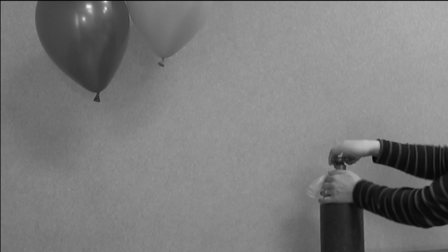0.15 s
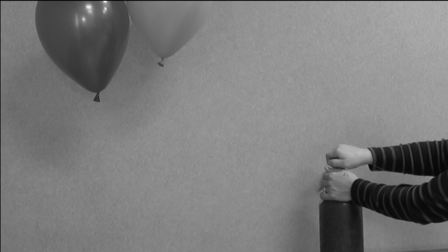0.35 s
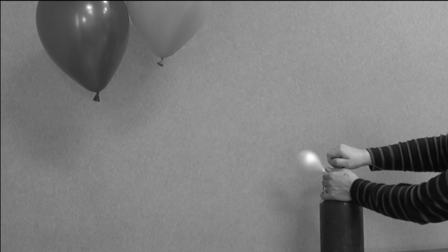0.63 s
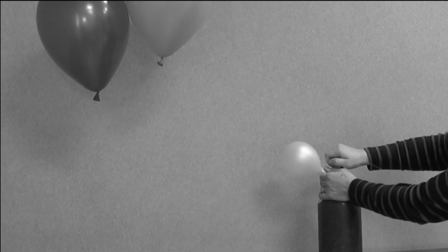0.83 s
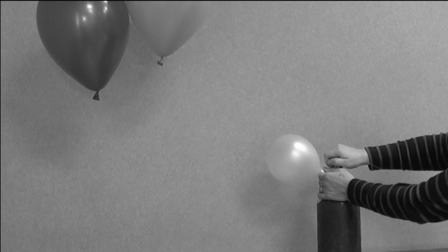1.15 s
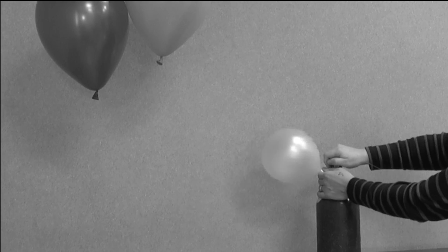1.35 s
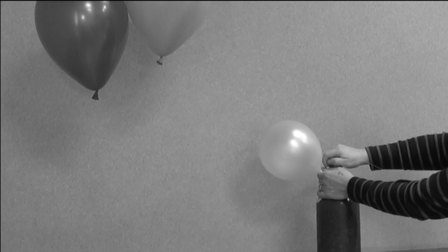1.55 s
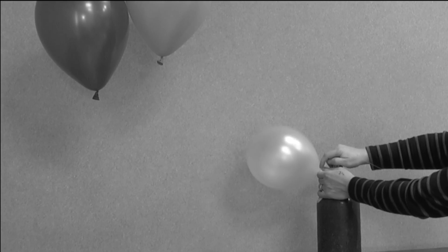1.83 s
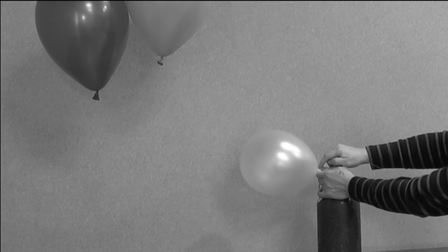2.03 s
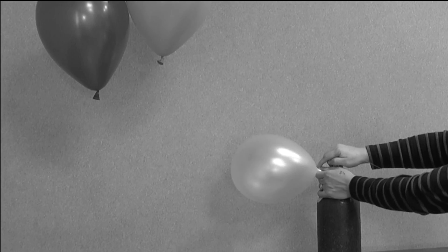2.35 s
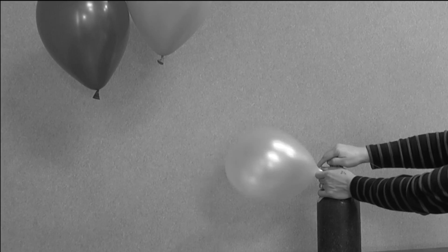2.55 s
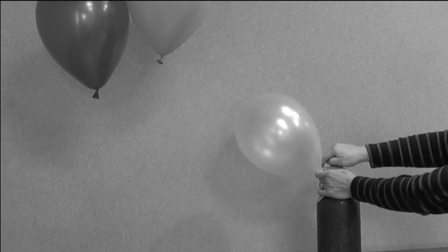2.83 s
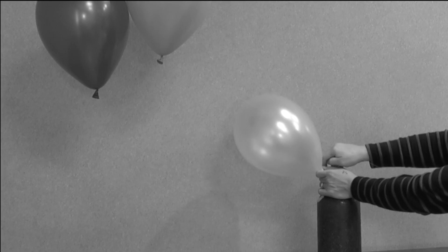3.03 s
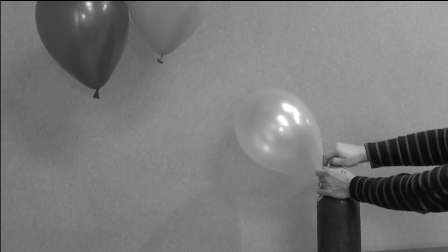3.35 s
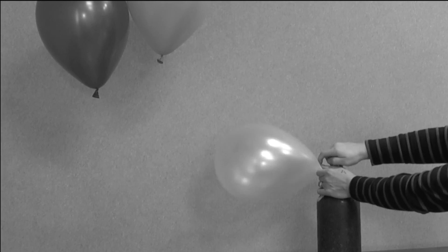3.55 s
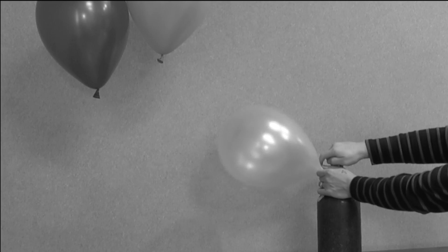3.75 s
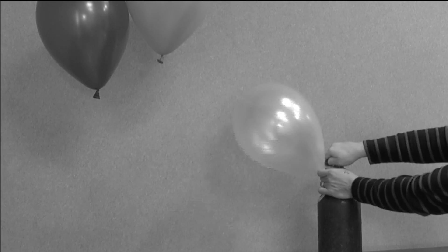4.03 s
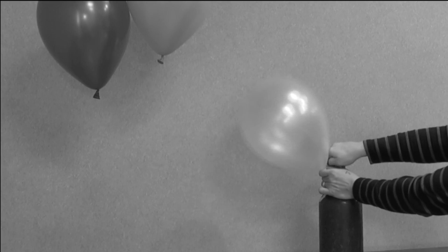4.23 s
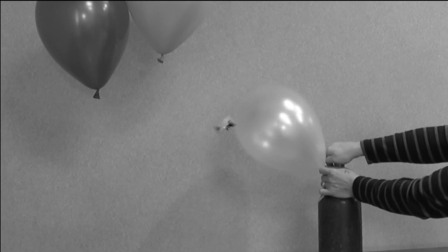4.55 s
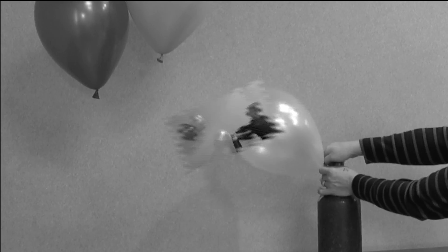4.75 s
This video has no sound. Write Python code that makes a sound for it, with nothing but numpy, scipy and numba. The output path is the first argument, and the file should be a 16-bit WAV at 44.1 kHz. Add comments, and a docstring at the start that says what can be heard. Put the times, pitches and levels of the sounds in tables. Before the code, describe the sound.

In a small hard-walled room with a low motor hum, fingers tick on a gas cylinder valve. A sharp, bright hiss bursts out, rings with gliding whistly tones and sinks in pitch as the balloon swells. It surges, flutters, drops, returns weaker, then dies away. A tick and two thin puffs follow. A camera microphone nearby holds the loud parts down.

```python
"""Balloon filled from a gas cylinder

A hand opens a gas cylinder in bursts and a balloon swells on the nozzle in a quiet, humming room.
Jet turbulence is noise that rings moving resonators: a ladder of gas modes that climbs as helium drives
out the air and sinks as the balloon grows, the tones of the neck, and the modes of the skin.
Fingers tick on the valve as decaying noise bands, and near the end the neck leaks two thin puffs of hiss.
Motor harmonics, moving air and a faint whine fill the room; hard walls echo the balloon and the valve."""
import sys
import numpy as np
from scipy import signal
from scipy.fft import rfft, irfft, next_fast_len
from scipy.io import wavfile
from scipy.ndimage import uniform_filter1d
from numba import njit

SR = 44100
rng = np.random.default_rng(int(sys.argv[2]) if len(sys.argv) > 2 else 0)


def natural_amplitude(level_db):
    """Convert a level in decibels to a linear amplitude factor, elementwise."""
    exponent = np.asarray(level_db, float) / 20
    return 10 ** exponent


def persist_wave(psi):
    """Save psi, clipped to +-1, as 16-bit WAV."""
    counts = np.round(np.clip(psi, -1, 1) * 32767).astype(np.int16)
    wavfile.write(sys.argv[1], SR, np.atleast_2d(counts).T)


N = 215957
TIME = np.arange(N) / SR  # s
PAIR = np.array([[1], [-1]])  # signs of the side signal, left and right


def level(x, db):
    """Root-mean-square normalisation: scale to an rms level in dB."""
    return x * natural_amplitude(db) / np.sqrt(np.mean(x ** 2))


def curves(table):
    """Linear interpolation: the columns after the time column, one value a sample."""
    s, *columns = np.transpose(table)
    return [np.interp(TIME, s, column) for column in columns]


def fade(span, dbs):
    """Exponential gain: slides evenly in dB from one level to another over a span of time."""
    return natural_amplitude(np.interp(TIME, span, dbs))


def colour(x, *spectra, share=1):
    """Spectral shaping: filter by the sum of (Hz, dB) curves, times a share, on a log frequency axis."""
    size = next_fast_len(N)
    log_hz = np.log(np.arange(size // 2 + 1) * SR / size + 1)
    db = 0
    for points in spectra:
        hz, point_db = np.transpose(points)
        db = db + np.interp(log_hz, np.log(hz + 1), point_db)
    return irfft(rfft(x, size) * natural_amplitude(share * db), size)[..., :N]


def band(x, lo_hz, hi_hz):
    """Zero-phase filtering: a gentle band-pass run forwards and backwards."""
    sos = signal.butter(2, [lo_hz, hi_hz], "bandpass", fs=SR, output="sos")
    return signal.sosfiltfilt(sos, x)


@njit
def resonator(x, hz, width):
    """Damped resonance: a state-variable band-pass with a moving centre and unit gain there."""
    y, b, l = np.empty(len(x)), 0., 0.  # band and low states
    for i in range(len(x)):
        g, k = np.tan(np.pi * hz[i] / SR), width / hz[i]
        v = (b + g * (x[i] - l)) / (1 + g * (g + k))
        b, l, y[i] = 2 * v - b, l + 2 * g * v, k * v
    return y


def walk(rate):
    """Random modulation: levels held 1 / rate seconds and smoothed twice; spread near 1."""
    hold = int(SR / rate)
    steps = np.repeat(rng.standard_normal(N // hold + 1), hold)
    return 1.012 * uniform_filter1d(uniform_filter1d(steps, hold), hold)[:N]


# Motor harmonics. Each row: multiple of the turning rate, relative level in dB.
MOTOR_HARMONICS = [(2, -32), (3, -3.5), (4, -0.5), (5, -4), (6, -12.5), (7, -14), (9, -10.5)]
# Spectrum of the moving air. Each row: frequency in Hz, relative level per Hz in dB.
AIR_COLOUR = [(24, -48), (40, -16), (96, -8), (154, -2.5), (368, -12.5), (670, -19), (758, -8.5),
              (859, -23.5), (1250, -27), (1520, -27.5), (1960, -25), (2330, -28.5), (2570, -23),
              (6810, -31.5), (15500, -53)]
# Side-to-mid balance of the room as heard, nearly mono around 4.4 kHz.
# Each row: frequency in Hz, side minus mid in dB.
ROOM_SIDE_BALANCE = [(60, -8), (110, -5), (200, -10.5), (380, -5), (700, -7), (1290, -4), (2380, -6),
                     (4400, -25), (8120, -13), (15000, -7)]
MOTOR_HZ, WHINE_HZ = 32.64, 2290  # mean turning rate; centre of the whine
ROOM_DB, AIR_DB, WHINE_DB = -46, -2, -17  # the last two relative to the first


def room():
    """Harmonic and broadband noise: an uneven motor, moving air, a faint whine and microphone hiss."""
    turn = 2 * np.pi * np.cumsum(MOTOR_HZ * (1 + 0.0159 * walk(6))) / SR
    motor = 0
    for k, db in MOTOR_HARMONICS:
        motor = motor + natural_amplitude(db + 2.7 * walk(9)) * np.sin(k * turn + .5 * walk(12))
    motor = level(motor, -2.2) * natural_amplitude(-.8 * PAIR)  # stronger on the right

    mid = colour(rng.standard_normal(N), AIR_COLOUR)
    side = colour(rng.standard_normal(N), AIR_COLOUR, ROOM_SIDE_BALANCE)
    air = level(mid + side * PAIR, AIR_DB)

    whine = level(resonator(rng.standard_normal(N), np.full(N, WHINE_HZ), 40.), WHINE_DB)
    hiss = colour(rng.standard_normal((2, N)), [(3000, -22), (8000, -4), (16000, -2)])
    return natural_amplitude(ROOM_DB) * (motor + air + whine) + level(hiss, -67.5)


# Fingers on the valve. Each row: start in seconds, relative level in dB, centre in Hz, width in Hz,
# time for the tail to fall 60 dB in seconds.
VALVE_TICKS = [(0.054, -38.5, 5170, 6000, 0.097), (.16, -50, 965, 300, .15), (.21, -54, 1100, 400, 0.32),
               (.256, -43.5, 3740, 1200, 0.099), (.333, -50, 4380, 5000, 0.12),
               (0.334, -47, 1190, 302, 0.11), (.632, -37, 595, 600, 0.064), (4.533, -32, 3180, 2800, 0.05)]
RING_S, RING_DB, RING_HZ, RING_T60_S = 0.037, -54, 3334, 0.64  # metal
THUMP_S, THUMP_DB, THUMP_HZ, THUMP_LENGTH_S = 4.3, -47, 61.4, .06  # cylinder


def ticks():
    """Free decay after impact: dull cracks with noisy tails, a thin metal ring and a soft low thump."""
    out = np.zeros((2, N))
    for s, db, hz, width, t60 in VALVE_TICKS:
        age = np.maximum(TIME - s, 0)
        crack = .5 * np.exp(-age / 0.0054)
        tail = 1.01 * np.exp(-np.log(1000) * age / t60)
        shape = (crack + tail) * (1 - np.exp(-age / 0.0014))  # soft skin: no sharp edge
        centre, width = np.full(N, float(hz)), float(width)
        mid = resonator(resonator(rng.standard_normal(N), centre, width), centre, width)
        side = resonator(resonator(rng.standard_normal(N), centre, width), centre, width)
        out += natural_amplitude(db) * shape * level(mid + 0.12 * side * PAIR, -1.8)

    age = np.maximum(TIME - RING_S, 0)
    ring_shape = natural_amplitude(RING_DB + 3.4 * walk(43)) * np.exp(-np.log(1000) * age / RING_T60_S)
    ring = ring_shape * np.sin(2 * np.pi * RING_HZ * age)
    swing = np.exp(-((TIME - THUMP_S) / THUMP_LENGTH_S) ** 2)
    thump = natural_amplitude(THUMP_DB) * swing * np.sin(2 * np.pi * THUMP_HZ * TIME)
    return out + ring + thump


# Puffs from the neck. Each row: start in seconds, attack in seconds, length in seconds, level in dB,
# sizzle relative to the hiss in dB.
LEAK_PUFFS = [(4.335, .006, 0.096, -54, 3), (4.541, 0.043, 0.2, -44, -6)]
# Spectrum of the leak. Each row: frequency in Hz, relative level per Hz in dB.
LEAK_SPECTRUM = [(880, -70), (1500, -33), (2180, -14), (2790, -14), (3200, -13), (4390, -11), (6640, -2.5),
                 (8660, -6), (12700, -21.5), (15800, -36)]
# Side-to-mid balance as heard, also used by jet(): wide in lows and highs, nearly mono around 4.4 kHz.
# Each row: frequency in Hz, side minus mid in dB.
SIDE_BALANCE = [(110, 0), (300, -11), (700, -7), (1300, -7), (2000, -9), (2700, -23), (4400, -26),
                (6500, -39), (7600, -15), (8600, -4), (11500, -6), (15000, -5.5)]
WHISTLE_HZ, WHISTLE_WIDTH_HZ, WHISTLE_DB = 6740, 710, 3.5  # resonance of the pinched neck
LEAK_FADE_DB_PER_S, SIZZLE_EXTRA_FADE_DB_PER_S = 150, 150


def leak():
    """Constriction noise: a thin hiss rings the pinched neck; each puff swells, holds and fades."""
    mid, side = colour(rng.standard_normal((2, N)), LEAK_SPECTRUM) * natural_amplitude(2.0 * walk(60))
    mid = mid + natural_amplitude(WHISTLE_DB) * resonator(mid, np.full(N, WHISTLE_HZ), WHISTLE_WIDTH_HZ)
    both = mid + colour(side, SIDE_BALANCE) * PAIR
    hiss = level(band(both, 1200, 8000), 0)
    sizzle = level(band(both, 11200, 20000), 0)
    out = 0
    for s, attack, length, level_db, sizzle_db in LEAK_PUFFS:
        after = np.maximum(TIME - s - length, 0)
        rise = np.clip((TIME - s) / attack, 0, 1)
        shape = rise * natural_amplitude(level_db - LEAK_FADE_DB_PER_S * after)
        sizzle_gain = natural_amplitude(sizzle_db - SIZZLE_EXTRA_FADE_DB_PER_S * after)
        out = out + shape * (hiss + sizzle_gain * sizzle)
    return out


# Modes of the gas in the balloon. Each row: time in seconds, first rung in Hz, rung spacing in Hz,
# first rung level in dB.
GAS_LADDER = [(.58, 6000, 2110, 4), (.63, 7400, 2380, 10), (.7, 8800, 2410, 13), (.8, 8970, 2350, 13),
              (.9, 8280, 2280, 11), (1.0, 7550, 2130, 9.5), (1.2, 6650, 1990, 11), (1.5, 5890, 1750, 12),
              (1.75, 5280, 1620, 10), (2.1, 5100, 1440, 12), (2.3, 4860, 1370, 8), (2.9, 4980, 1320, 6),
              (3.4, 5250, 1230, 8.5), (4.1, 5170, 1160, 9.5)]
RUNG_WIDTH_HZ, UPPER_WIDTH_HZ = 510, 270.
SQUEEZE = .012  # share of the spacing lost with each higher rung
UPPER_DB, UPPER_FADES_S = (14, 3), (1.13, 2.1)  # upper rungs ring less as the balloon grows


def gas_ladder(noise):
    """Cavity modes: the turbulence rings a first rung and nine upper rungs that glide together."""
    first, spacing, first_db = curves(GAS_LADDER)
    rung = natural_amplitude(2.3 * walk(13)) * resonator(noise, first, RUNG_WIDTH_HZ)
    upper = 0
    for k in range(1, 10):
        hz = first + k * (1 + SQUEEZE * (2 - k)) * spacing  # higher rungs stand closer together
        hz = np.minimum(hz * (1 + 0.0091 * walk(15)), .45 * SR)
        upper = upper + natural_amplitude(3.9 * walk(11)) * resonator(noise, hz, UPPER_WIDTH_HZ)
    return natural_amplitude(first_db) * rung + fade(UPPER_FADES_S, UPPER_DB) * upper


# Tones of the neck. Each row: time in seconds, lower tone in Hz, upper tone in Hz, level in dB.
NECK_TONES = [(.58, 3730, 4480, 14), (.62, 4180, 5100, 10.5), (.7, 4170, 5940, 14), (.8, 4560, 5930, 13),
              (1.0, 4700, 5480, 10.5), (1.08, 4530, 5700, 11), (1.17, 4130, 5580, 9.5),
              (1.5, 4000, 5430, -1.5), (2.0, 4480, 5740, -9), (2.4, 4480, 5650, 9.5),
              (2.8, 4500, 5580, 5.5), (3.4, 4440, 5800, 4), (4.1, 4570, 5800, 0)]
NECK_WIDTH_HZ = 220


def neck_tones(noise):
    """Duct resonance: two gliding tones of the neck, each wavering in level."""
    low_hz, high_hz, db = curves(NECK_TONES)
    low = natural_amplitude(5.6 * walk(14)) * resonator(noise, low_hz, NECK_WIDTH_HZ)
    high = natural_amplitude(-1.0 + 3.0 * walk(14.2)) * resonator(noise, high_hz, NECK_WIDTH_HZ)
    return natural_amplitude(db) * (low + high)


# Still modes of the skin. Each row: frequency in Hz, width in Hz, level slack in dB, level taut in dB.
SKIN_MODES = [(732, 120, 5.5, 7), (1750., 780, 1, -1.5), (2070, 400, 0.5, 8.5), (2753, 220, 6, -3),
              (14640, 1100, -12, 4)]
# Low swell, one glide after another. Each row: start in seconds, first frequency in Hz,
# slope in Hz per second, level in dB.
SWELL_GLIDES = [(.58, 700, 650, 2), (.98, 328, 560, 3), (1.45, 484, 360, 1.5), (1.85, 268, 25, 4.5),
                (3.1, 380, 1, 6)]
SLACK_S, TAUT_S = 1.2, 2.45  # the skin begins to tighten; it has stretched tight
SING_S, SING_HZ, SING_DB = (1.9, 2.05, 2.8, 2.95), 728, 11  # swells, holds, stops


def skin_modes(noise):
    """Membrane resonance: still skin modes shift in level; the nozzle sings and a low swell glides."""
    skin = 0
    for hz, width, slack_db, taut_db in SKIN_MODES:
        gain = fade((SLACK_S, TAUT_S), (slack_db, taut_db)) * natural_amplitude(1.4 * walk(6.93))
        skin = skin + gain * resonator(noise, np.full(N, hz), width)

    sing_shape = np.interp(TIME, SING_S, (0, 1, 1, 0))
    sing = natural_amplitude(SING_DB) * sing_shape * resonator(noise, np.full(N, SING_HZ), 57.0)

    swell_hz, swell_db = np.full(N, float(SWELL_GLIDES[0][1])), 0
    for s, hz, hz_per_s, db in SWELL_GLIDES:
        swell_db = np.where(TIME >= s, db, swell_db)
        swell_hz = np.where(TIME >= s, hz + hz_per_s * (TIME - s), swell_hz)
    swell = natural_amplitude(swell_db) * resonator(noise, swell_hz, 96.0)
    return skin + sing + swell


def balloon(noise):
    """Superposition of modes: turbulence plus its ring in the gas ladder, the neck and the skin."""
    return noise + gas_ladder(noise) + neck_tones(noise) + skin_modes(noise)


# Band levels of the jet over time, in two lists that follow on. Each row: time in seconds, hiss in dB,
# then boom, low rush and sizzle, all three in dB relative to the hiss.
JET_BAND_LEVELS = [
    [(.54, -81, 1, 15, -6), (.59, -37, -9, -36, -24), (.64, -25.5, -11.5, -18, -15),
     (.74, -24.5, -10, -30, -6), (.77, -14, -13, -21, -11), (.88, -12.5, -7.5, -17.5, -5),
     (1.25, -13.5, -10, -15.5, -5.5), (1.55, -4, -17, -23.5, -9.5), (1.85, -3.5, -14, -26.5, -9.5),
     (2.28, -14, -5.5, -21.5, -3.5), (2.55, -9, -8, -27.5, -5.5), (2.72, -6.5, -11, -29.5, -9.5),
     (2.76, -11.5, -10, -25.5, -5), (2.8, -6.5, -12.5, -28, -9), (2.92, -7.5, -12.5, -27, -11),
     (3.0, -16, -9.5, -26, -19), (3.07, -20, -8.5, -23, -15), (3.2, -26, -12, -23.5, -7.5),
     (3.33, -25.5, -18, -35, -14)],
    [(3.34, -22, -12.5, -28.5, -14), (3.37, -17, -9.5, -26.5, -11), (3.72, -22.5, -7, -24.5, -2),
     (3.97, -20.5, -7.5, -23, -4), (4.01, -29.5, -17, -26, -29), (4.11, -36.5, -7, -16, -16),
     (4.22, -47.5, -1.5, -14, -2), (4.32, -57.5, -1.5, -5, -1), (4.5, -66, 1, 2, -4)],
]
# Spectrum of the jet. Each row: frequency in Hz, relative level per Hz in dB.
JET_SPECTRUM = [(120, -64), (200, -19), (378, -17), (641, -19), (742, -18.5), (906, -17.5), (1110, -12),
                (1300, -15), (1430, -15), (2090, -16), (3550, -8.5), (5110, -1.5), (6710, -6.5),
                (8820, -15.5), (15500, -14.5)]
# Panning curve, weighted for each side below. Each row: frequency in Hz, lean to the left in dB.
JET_LEAN = [(60, -2.5), (110, -1.0), (200, 2), (380, -0.5), (700, 2.5), (1290, 2.5), (2380, 2), (4400, 0.5),
            (8120, 1.5), (15000, 1)]
JET_START_S = .54


def jet():
    """Turbulent jet noise: bands of hiss, boom, low rush and sizzle rise, flutter and fall."""
    hiss_db, boom_db, rush_db, sizzle_db = curves(np.concatenate(JET_BAND_LEVELS))
    flutter = natural_amplitude(0.97 * walk(150) + 0.9 * walk(12))  # eddies
    mid = colour(balloon(flutter * rng.standard_normal(N)), JET_SPECTRUM)
    side = colour(balloon(flutter * rng.standard_normal(N)), JET_SPECTRUM, SIDE_BALANCE)
    left = colour(mid + side, JET_LEAN, share=0.98)
    right = colour(mid - side, JET_LEAN, share=-0.52)
    both = np.array([left, right])
    hiss = natural_amplitude(0.004) * level(band(both, 3270, 8630), 0)
    boom = natural_amplitude(boom_db) * level(band(both, 1100, 3460), 0)
    rush = natural_amplitude(rush_db) * level(band(both, 216, 994), 0)
    sizzle = natural_amplitude(sizzle_db) * level(band(both, 8400, .48 * SR), 0)
    return natural_amplitude(hiss_db) * (TIME > JET_START_S) * (hiss + boom + rush + sizzle)


# Reverberation time. Each row: frequency in Hz, time to fall 60 dB in seconds.
WALL_T60 = [(200, 0.72), (2000, 0.65), (5000, 0.29), (10000, 0.27), (16000, 0.45)]
ECHO_DB = -2  # tail energy relative to the direct sound


def echo(x):
    """Diffuse reverberation: hard walls give a dense noise tail that dies sooner in treble than in bass."""
    size = SR // 2
    age, tail = np.arange(size) / SR, 0
    edges = 165 * 2. ** np.arange(8)  # octave bands, Hz
    for lo, hi in zip(edges[:-1], edges[1:]):
        t60 = np.interp(np.sqrt(lo * hi), *np.transpose(WALL_T60))
        tail = tail + band(rng.standard_normal(size), lo, hi) * np.exp(-np.log(1000) * age / t60)
    tail = tail * (age > .004) * natural_amplitude(ECHO_DB) / np.sqrt(np.sum(tail ** 2))
    wet = signal.fftconvolve(x, tail[None], axes=1)[:, :N]
    return (x + wet) / np.sqrt(1 + natural_amplitude(2 * ECHO_DB))


def scene():
    """Superposition of sources: balloon and valve with their echo, over the room, left and right."""
    return echo(jet() + leak() + ticks()) + room()


LIMIT_DB, RATIO, LISTEN_S, RECOVER_DB_PER_S = -23.5, 6.12, 0.039, 29


def gain_control(x):
    """Dynamic compression: turns down at once what exceeds the limit and recovers at a steady rate."""
    power = uniform_filter1d(np.mean(x ** 2, axis=0), int(LISTEN_S * SR))
    excess_db = np.maximum(10 * np.log10(np.maximum(power, 1e-12)) - LIMIT_DB, 0)
    cut_db = excess_db * (1 - 1 / RATIO)
    ramp = RECOVER_DB_PER_S * TIME
    return x * natural_amplitude(ramp - np.maximum.accumulate(cut_db + ramp))


def band_limit(x):
    """A steep low-pass at the top of the band."""
    return signal.sosfilt(signal.butter(12, 16920, fs=SR, output="sos"), x)


def record(dry):
    """Band limiting: the camera holds the level down, then cuts the top and the deep bass."""
    held = gain_control(dry)
    low_pass = signal.ellip(10, .2, 70, 15760, fs=SR, output="sos")
    high_pass = signal.butter(2, 65., "highpass", fs=SR, output="sos")
    mix = signal.sosfilt(high_pass, signal.sosfilt(low_pass, held))
    return band_limit(mix)


dry = scene()
out = record(dry)
persist_wave(out)
```